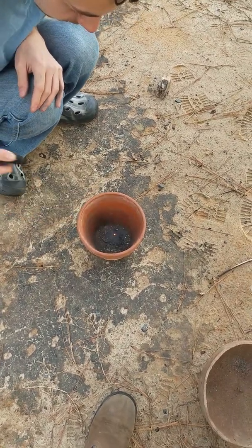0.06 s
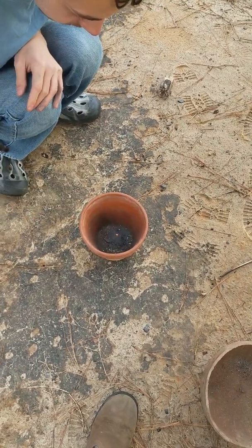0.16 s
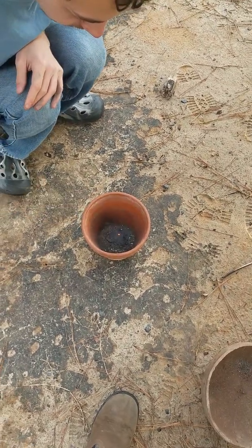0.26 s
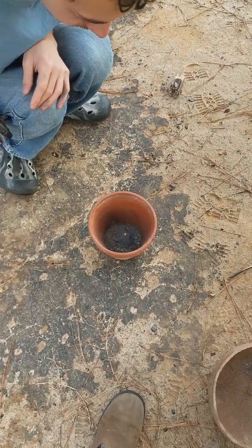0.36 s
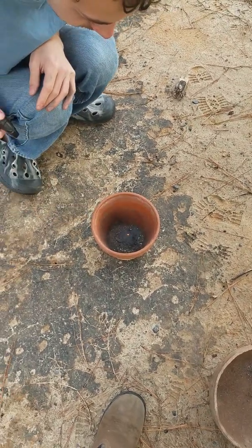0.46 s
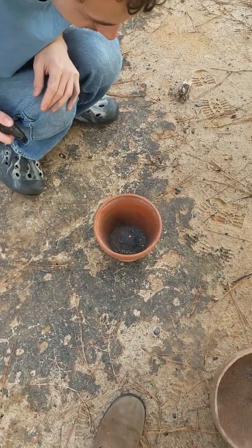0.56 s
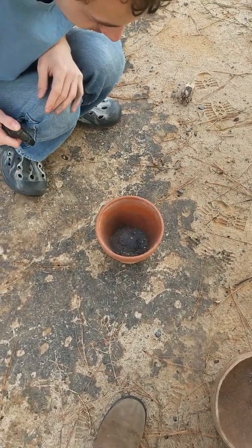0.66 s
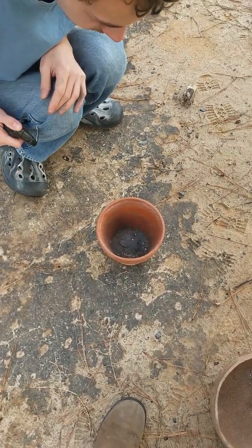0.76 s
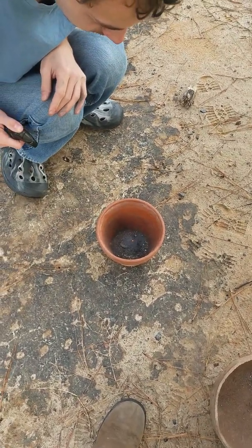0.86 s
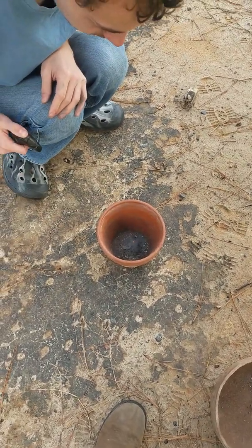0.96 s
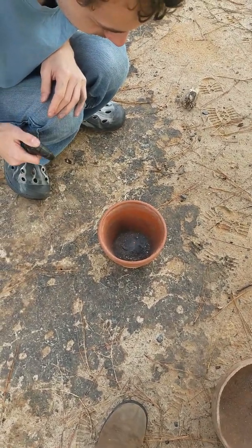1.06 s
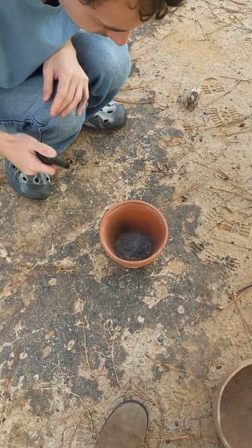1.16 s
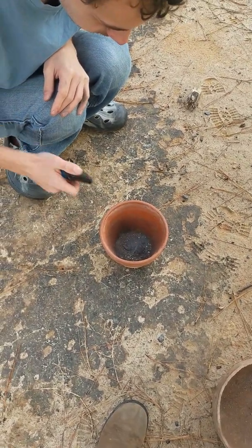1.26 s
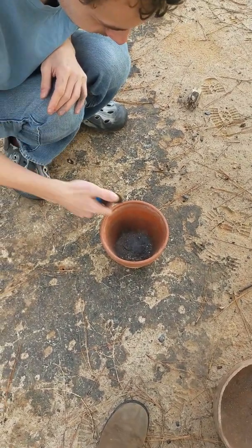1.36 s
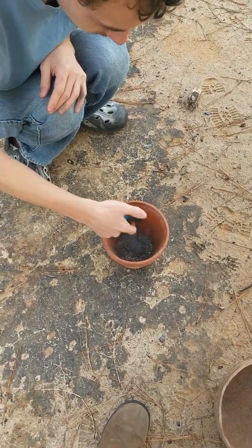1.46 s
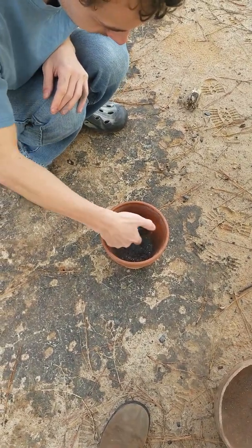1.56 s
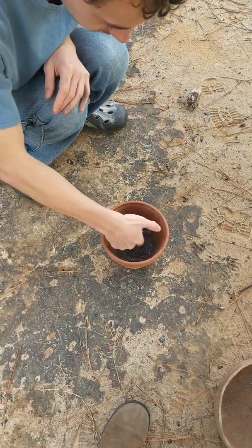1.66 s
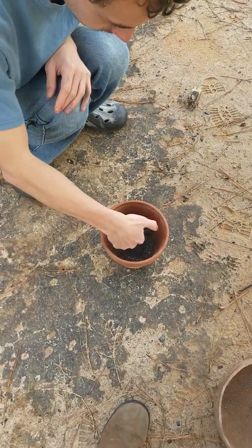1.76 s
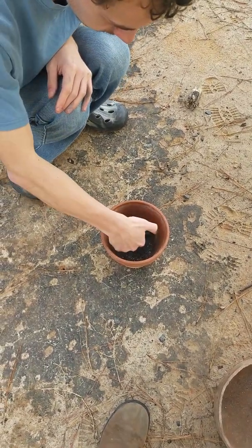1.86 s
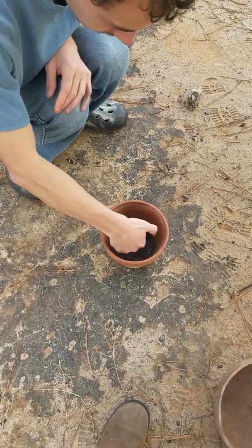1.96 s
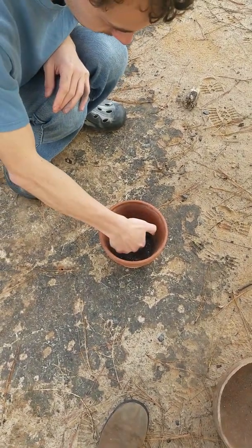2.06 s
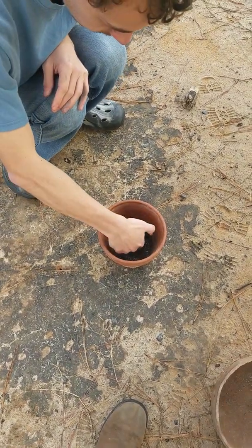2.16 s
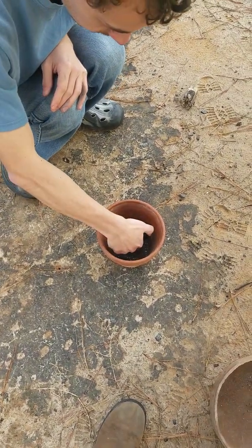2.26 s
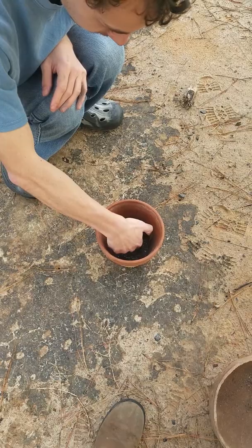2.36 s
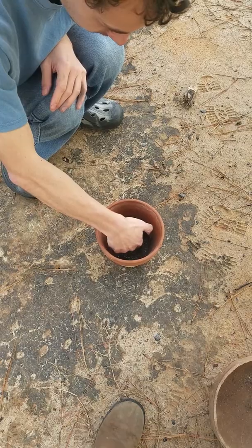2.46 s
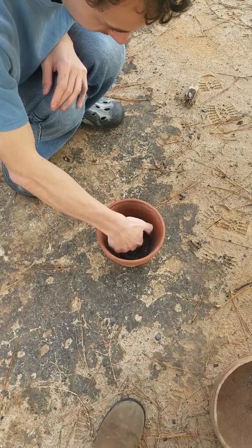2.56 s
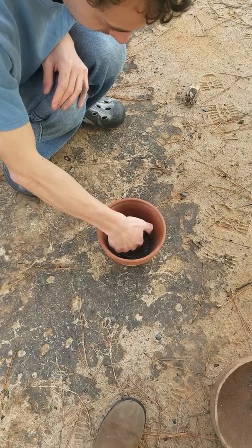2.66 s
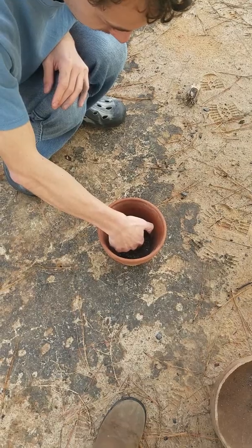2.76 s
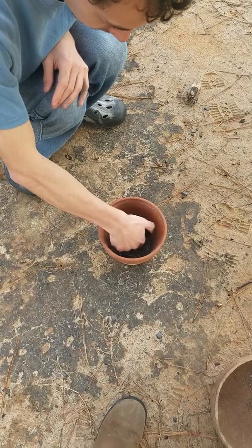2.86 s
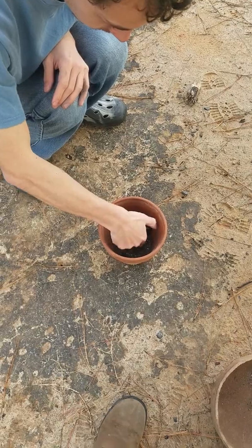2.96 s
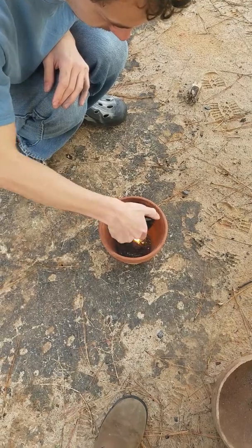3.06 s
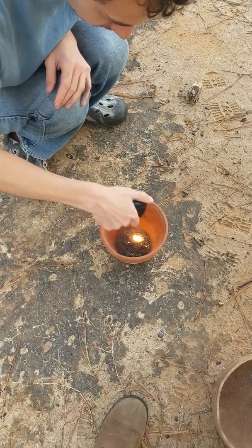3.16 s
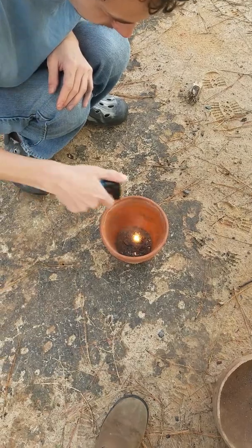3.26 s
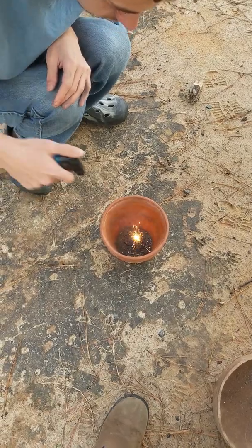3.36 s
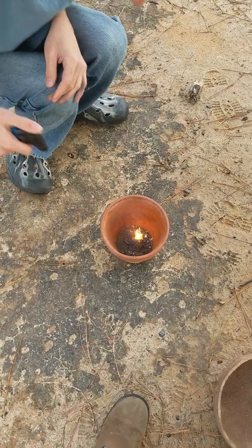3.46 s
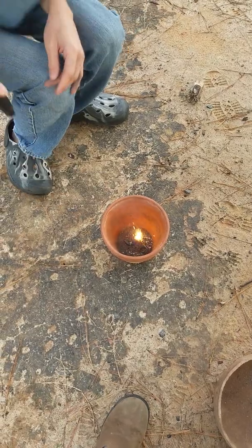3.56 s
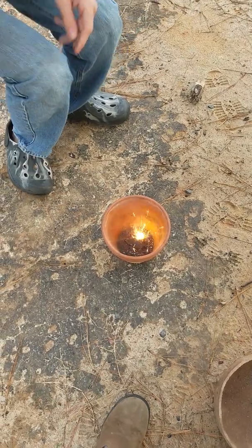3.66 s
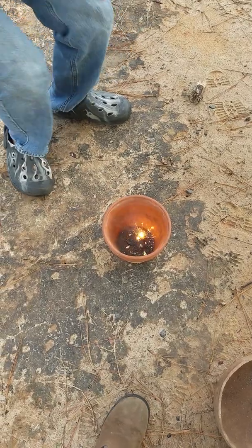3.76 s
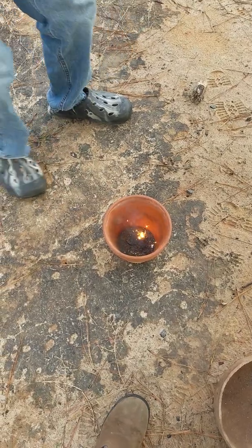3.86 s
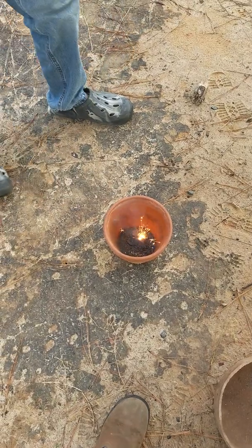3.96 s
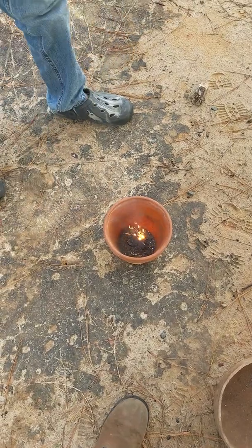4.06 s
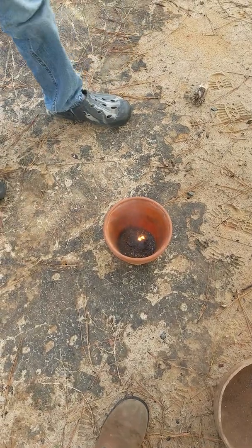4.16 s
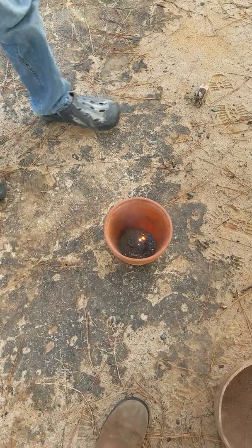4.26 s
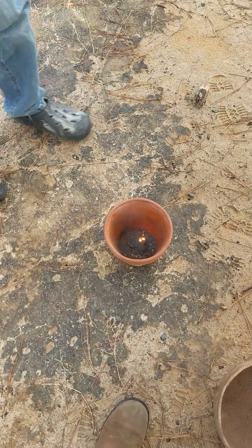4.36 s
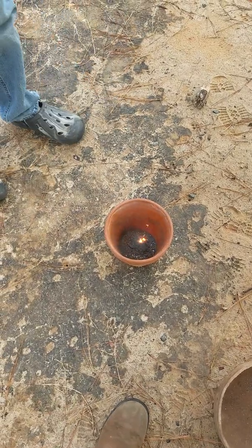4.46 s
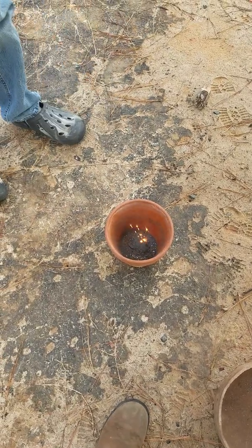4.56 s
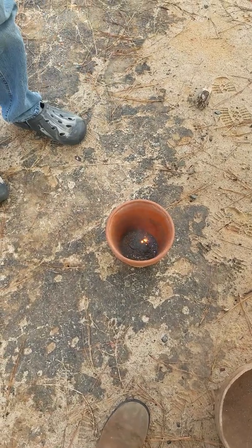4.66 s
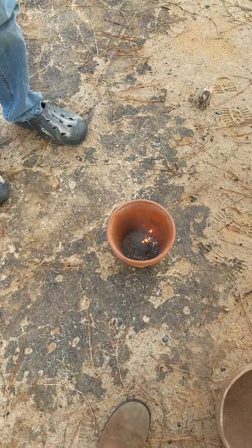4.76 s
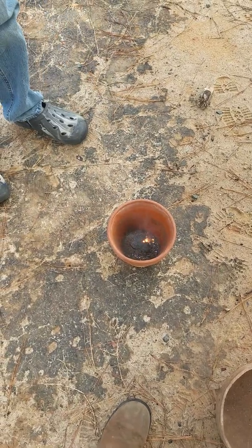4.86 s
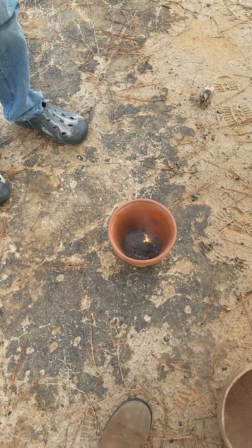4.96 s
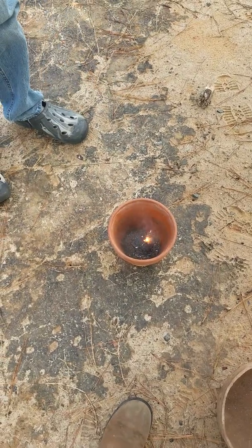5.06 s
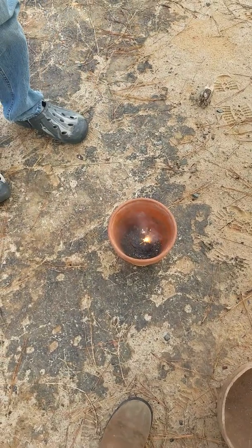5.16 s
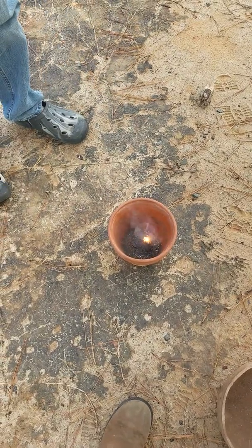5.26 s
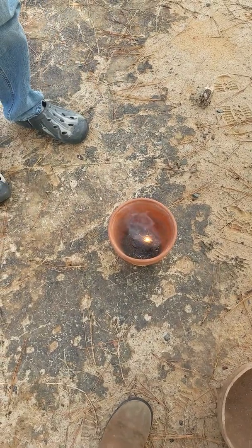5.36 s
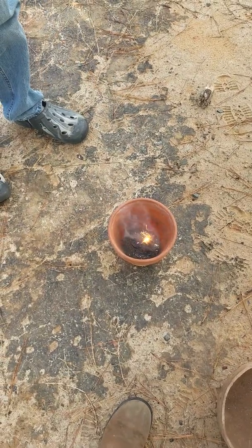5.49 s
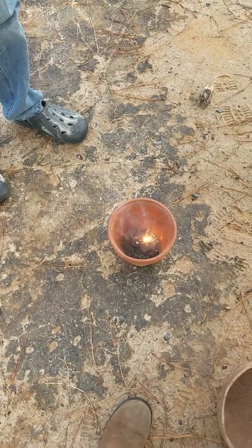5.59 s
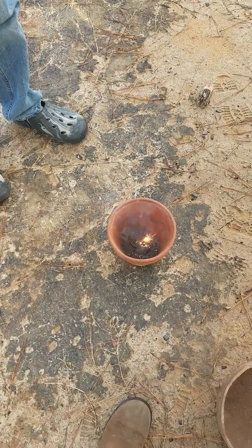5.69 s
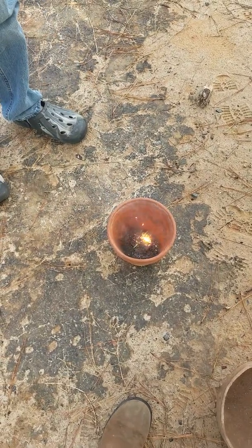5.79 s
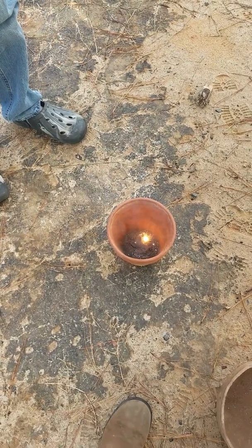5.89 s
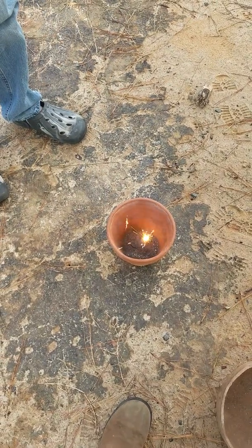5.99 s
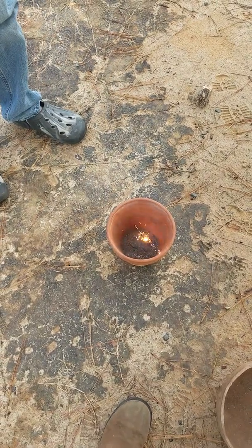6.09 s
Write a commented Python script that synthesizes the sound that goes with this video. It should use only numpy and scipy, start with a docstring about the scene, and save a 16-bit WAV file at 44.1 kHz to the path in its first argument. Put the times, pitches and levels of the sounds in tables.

```python
"""Over a low outdoor rumble, someone crouches with a fading rustle of cloth noise; a faint bird whistles
gliding tones and a far squeal sounds as narrow noise. A lighter knocks as struck modes, its gas hisses as
coloured noise, the igniter snaps in noise bursts and a soft flame roars over a weaker hiss. Powder in a
clay pot catches in showers of tiny grains, the trigger is let go, and the fizz goes on unevenly with pitched
pops and hollow puffs, while shoes scuff back over gritty concrete in resonant scrapes and dull thuds."""
import sys
import numpy as np
from scipy import signal
from scipy.fft import rfft, irfft, next_fast_len
from scipy.io import wavfile

SR = 44100
rng = np.random.default_rng(int(sys.argv[2]) if len(sys.argv) > 2 else 0)


def int16_out(signal):
    """Quantize to a 16-bit WAV file."""
    q = np.round(np.clip(np.atleast_2d(signal).T, -1, 1) * 32767)
    wavfile.write(sys.argv[1], SR, q.astype(np.int16))


N = 270257
TIME = np.arange(N) / SR   # seconds
SIZE = next_fast_len(N + 8192)   # transform length, with room for filter tails
BINS = np.maximum(np.arange(SIZE // 2 + 1) * SR / SIZE, 1)   # Hz


def from_db(db):
    """Decibels to gain."""
    return 10 ** (np.asarray(db) / 20)


def rms_one(x):
    """Scale to unit power."""
    return x / np.sqrt(np.mean(x ** 2) + 1e-20)


def gains(rows):
    """One gain curve per dB column, silent outside the table."""
    s, *columns = np.transpose(rows)
    return [from_db(np.interp(TIME, s, c, left=-np.inf, right=-np.inf)) for c in columns]


def per_bin(points):
    """Read a table along a log-frequency axis."""
    hz, value = np.transpose(points)
    return np.interp(np.log(BINS), np.log(hz), value)


def drift(rate):
    """Random wandering of unit power, with `rate` straight segments a second."""
    knots = rng.standard_normal(int(N / SR * rate) + 2)
    return rms_one(np.interp(TIME * rate, np.arange(len(knots)), knots))


def envelope(start_s, end_s, attack_s, t60):
    """Rise, hold, then die away by 60 dB in t60 seconds."""
    rise = np.clip((TIME - start_s) / attack_s, 0, 1)
    return rise * from_db(-60 * np.maximum(TIME - end_s, 0) / t60)


def white():
    """Two unrelated noises."""
    return rng.standard_normal((2, N))


def grains(per_s, spread_db):
    """One-sample impulses at random moments; a wider spread makes a few stand out."""
    born = rng.random(N) < per_s / SR
    boost_db = spread_db * np.minimum(rng.exponential(1, N), 4)
    return rms_one(white() * born * from_db(boost_db))


def colour(x, spectrum):
    """Causal filter of unit power gain that falls away steeply beyond its table."""
    low_skirt = 1 + (spectrum[0][0] / BINS / np.sqrt(2)) ** 8
    high_skirt = 1 + (BINS / spectrum[-1][0] / np.sqrt(2)) ** 8
    gain = rms_one(from_db(per_bin(spectrum)) / np.sqrt(low_skirt * high_skirt))
    # folding the cepstrum forward gives minimum phase, so the response starts at once
    cepstrum = irfft(np.log(gain + 1e-6), SIZE)
    cepstrum[1:SIZE // 2] *= 2
    cepstrum[SIZE // 2 + 1:] = 0
    return irfft(rfft(x, SIZE) * np.exp(rfft(cepstrum)), SIZE)[:, :N]


def place(x, balance, likeness, lead_s=0):
    """Turn two unrelated signals into a stereo pair; the left's share of the right comes early by lead_s."""
    right, other = rfft(x, SIZE)
    alike = np.clip(per_bin(likeness), 0, 1)
    shared = alike * right * np.exp(2j * np.pi * BINS * lead_s)
    left = shared + np.sqrt(1 - alike ** 2) * other
    return irfft([left * from_db(per_bin(balance)), right], SIZE)[:, :N]


def resonate(x, hz, width_hz):
    """A two-pole resonance with gain near 1 at its top."""
    r = np.exp(-np.pi * width_hz / SR)
    poles = [1, -2 * r * np.cos(2 * np.pi * hz / SR), r * r]
    return signal.lfilter(np.array([1, 0, -1]) * (1 - r * r) / 2, poles, x)


def age(length):
    """Seconds since the start of a short sound."""
    return np.arange(int(length * SR) + 2) / SR


def burst(t60):
    """Dense noise, even in colour, that dies away."""
    t = age(t60)
    fade = from_db(-60 * t / t60)
    phases = np.angle(rfft(rng.standard_normal((2, len(t))) * fade))
    even = irfft(np.exp(1j * phases), len(t)) * fade ** .3
    return rms_one(even) * np.sqrt(np.mean(fade ** 2))


def ring(hz, t60):
    """A struck mode that builds up within about a cycle, in a random phase on each channel."""
    t = age(t60)
    swing = np.sin(2 * np.pi * (hz * t + rng.random((2, 1))))
    return swing * (1 - np.exp(-2 * hz * t)) * from_db(-60 * t / t60)


def add(out, s, sound):
    """Mix a short sound in at a moment."""
    part = out[:, int(s * SR):][:, :sound.shape[1]]
    part += sound[:, :part.shape[1]]


# Spectra of the burning powder: its low rush, its fizz in the flare and its fizz at a smoulder.
# Each row: frequency in Hz, relative level in dB per Hz.
RUSH_SPECTRUM = [(260, -4.5), (400, -9), (580, -1), (900, -2), (1350, 0.5), (1850, -3), (2220, -0.5),
                 (2650, -5), (3250, -3.5), (3850, -8.5), (4200, -12), (4900, -13.5), (5700, -20.5)]
FLARING_SPECTRUM = [(4200, -6.5), (5000, -4), (5800, -8), (6300, -1), (6800, -1), (7400, 3.5), (8500, -2),
                    (9400, -1), (10800, -2), (11800, 1), (12800, -4), (14000, -3), (15000, -4),
                    (15800, -18)]
SMOULDERING_SPECTRUM = [(5700, -14.5), (6000, -12), (6400, -5), (7900, -3), (8600, -8.5), (9300, -5.5),
                        (10000, -6), (11100, -3), (12000, 1), (13000, -3.5), (14000, -8), (14800, -5),
                        (15800, -8)]
# Air resonances in the pot. Each row: frequency in Hz, width in Hz, gain in dB on the rush.
POT_MODES = [(596, 84, -9.5), (2215, 110, -4.5), (3400, 460, -25)]


def powder(rush_db=6.5, fizz_db=7.0, sputter_db=1.0, flicker_db=0.8, flare_ends_s=4.6, settle_s=0.35):
    """Countless grains flash off in sputters; the pot rings with the rush and the fizz changes colour."""
    rush_gain, fizz_gain = burning()
    sputter = from_db(sputter_db * drift(110) + flicker_db * drift(25))
    rush = colour(grains(per_s=6000, spread_db=1.5), RUSH_SPECTRUM)
    pot = sum(from_db(db) * resonate(rush, hz, width) for hz, width, db in POT_MODES)
    rush = rms_one(rush + pot)
    sparks = grains(per_s=22000, spread_db=3.0)
    settled = np.clip((TIME - flare_ends_s) / settle_s + .5, 0, 1)   # crossfade, flare to smoulder
    flaring = (1 - settled) * colour(sparks, FLARING_SPECTRUM)
    fizz = flaring + settled * colour(sparks, SMOULDERING_SPECTRUM)
    return sputter * (from_db(rush_db) * rush_gain * rush + from_db(fizz_db) * fizz_gain * fizz)


# The powder catches, flares, sinks to a smoulder and picks up again.
# Each row: time in seconds, rush level in dB, fizz level in dB, both before the powder's trims.
BURN_COURSE = [(2.6, -72, -79.5), (2.9, -66.5, -65.5), (3.11, -60, -65), (3.19, -58, -59), (3.3, -58, -58),
               (3.6, -51.5, -52), (3.82, -52, -50.5), (3.89, -59, -54), (4.0, -50, -51),
               (4.19, -61.5, -58.5), (4.32, -63, -60), (4.52, -57, -56.5), (4.66, -60.5, -58),
               (5.06, -56.5, -57.5), (5.19, -58, -60), (5.42, -53, -56.5), (5.55, -56, -58.5),
               (6.13, -53.5, -55.5)]
# Spurts of the burning powder.
# Each row: centre in seconds, rush level in dB, fizz level in dB, both before the powder's trims.
SPURTS = [(3.425, -61, -55), (3.78, -53.5, -59), (4.216, -55.5, -55), (4.385, -55.5, -55.5),
          (4.58, -60, -54), (5.475, -51.5, -52), (5.58, -55.5, -57), (5.697, -54, -50), (6.02, -57, -56.5)]
SPURT_S = .07   # each swells and dies in this time


def burning():
    """Gains of rush and fizz: the powers of the slow burn and the spurts add up."""
    power = np.square(gains(BURN_COURSE))
    swell = np.hanning(len(age(SPURT_S))) ** 2
    for s, rush_db, fizz_db in SPURTS:
        add(power, s - SPURT_S / 2, from_db([[rush_db], [fizz_db]]) ** 2 * swell)
    return np.sqrt(power)


# The loudest sparks and grit cracking.
# Each row: start in seconds, pop level in dB before trim, pop centre in Hz, treble level in dB before trim.
CRACKS = [(3.2048, -41, 1330, -54), (3.3595, -36.5, 2260, -33), (3.5818, -43, 1850, -46),
          (3.7105, -46, 2330, -31), (3.7775, -32, 1730, -49), (3.8013, -34, 4200, -48),
          (3.8987, -49, 2230, -45), (4.032, -41, 2240, -54), (4.374, -43, 1030, -46),
          (4.5892, -45, 1688, -52), (4.775, -43.5, 1530, -51.5), (5.0125, -44, 2160, -52),
          (5.4326, -38.5, 1405, -54), (5.4915, -38, 1457, -45), (5.6895, -40, 2150, -42.5),
          (5.9299, -38, 1770, -56), (6.0183, -46, 1980, -49)]


def crackles(pop_db=-8, spit_db=-1, pop_t60=0.014, spit_t60=0.0087,
             sparks_per_s=80, spark_db=-3.0, spark_spread_db=2.0):
    """Each crack is a pitched pop with a spit of treble; lesser sparks snap at random as the powder burns."""
    pops, spits = np.zeros((2, 2, N))
    for s, db, hz, treble_db in CRACKS:
        pop = resonate(resonate(burst(pop_t60), hz, width_hz=480), hz, width_hz=10400)
        add(pops, s, from_db(db + pop_db) * rms_one(pop))
        add(spits, s, from_db(treble_db + spit_db) * burst(spit_t60))
    sparks = signal.fftconvolve(grains(sparks_per_s, spark_spread_db), burst(t60=.006), axes=1)[:, :N]
    rush_gain = gains(BURN_COURSE)[0]
    sparks = from_db(spark_db) * rush_gain * rms_one(sparks)
    return pops + colour(sparks, RUSH_SPECTRUM) + colour(spits + sparks / 2, FLARING_SPECTRUM)


# Gas bursting from the powder. Each row: start in seconds, level in dB.
PUFFS = [(3.205, -43), (3.36, -43), (3.655, -47), (3.752, -40), (3.78, -50), (4.325, -49), (5.43, -52),
         (5.49, -43), (5.69, -47), (5.775, -41), (5.845, -39.5), (6.02, -50)]


def puffs(t60=0.044):
    """Pockets of gas burst and sound the hollow of the pot at its lowest mode."""
    out = np.zeros((2, N))
    for s, db in PUFFS:
        add(out, s, from_db(db) * ring(POT_MODES[0][0], t60))
    return out


# Igniter snap. Each row: start in seconds, level in dB, 60 dB decay in seconds.
SNAP = [(2.1457, -16, 0.017), (2.1458, -9, 0.0063), (2.1476, -18.5, 0.024), (2.1486, -23.5, 0.032),
        (2.1585, -37, .02)]
# Handling of the lighter and the trigger let go.
# Each row: start in seconds, knock level in dB before halving, knock pitch in Hz, tick level in dB.
HANDLING = [(1.2063, -46, 2120, -54), (1.585, -46, 1880, -65), (1.5873, -46.5, 4500, -68),
            (1.772, -56, 2150, -75), (2.9277, -28, 2510, -34.5), (2.9396, -43, 2580, -59)]
# Lighter held inside the pot. Each row: frequency in Hz, level in dB on the blow, 60 dB decay in seconds.
LIGHTER_MODES = [(240, -2, 0.028), (383, -4.5, 0.022), (670, -2, 0.021), (2350, -6, 0.028),
                 (3545, 3.5, 0.023), (4580, -5, 0.031), (4980, 4, 0.034), (5300, -11.5, 0.03219),
                 (5820, -4, 0.03), (6540, 4, .03), (6857, -1, 0.02932), (8000, 6, 0.021),
                 (9100, 10.5, 0.013), (10030, 0.5, .03), (10870, -9, .028), (11990, -13, .03),
                 (13700, -15, .022)]
# Snap and tick spectrum. Each row: frequency in Hz, relative level in dB per Hz.
SNAP_SPECTRUM = [(150, -7), (300, -2), (1000, -10.5), (1600, -10), (2300, 1.5), (2900, -8.5), (3600, 5.5),
                 (4300, -4.5), (5400, 1), (6200, -0.5), (8500, 1), (13500, 2.5), (15000, -8),
                 (15800, -14.5)]
# Stereo lean of the lighter. Each row: frequency in Hz, left minus right in dB.
LIGHTER_BALANCE = [(300, 0.5), (1200, -11), (2200, -4.5), (3300, -9.5), (5800, -1), (8500, -14),
                   (12000, -11.5), (15500, -4.5)]
# Stereo likeness of all the near sounds. Each row: frequency in Hz, left-right likeness from 0 to 1.
NEAR_LIKENESS = [(300, 0.81), (600, 0.99), (1200, 0.7), (3300, 0.9), (5500, 0.3892), (13000, .35),
                 (15000, .1)]


def lighter(body_db=-25, knock_t60=0.0058, tick_t60=0.012, tick_ring_db=-13, scatter_db=-44, scatter_t60=0.12):
    """Gas hisses, the sprung igniter strikes, the jet burns, the trigger knocks back."""
    cracks, body = np.zeros((2, 2, N))
    for s, db, t60 in SNAP:
        add(cracks, s, from_db(db) * burst(t60))
    strike_s = SNAP[1][0]
    add(cracks, strike_s, from_db(scatter_db) * burst(scatter_t60))   # the snap rattles round the pot
    blows = [(strike_s, body_db)]
    for s, knock_db, hz, tick_db in HANDLING:
        add(body, s, from_db(knock_db) * rms_one(ring(hz, knock_t60)) / 2)
        add(cracks, s, from_db(tick_db) * burst(tick_t60))
        blows.append((s, tick_db + tick_ring_db))
    for s, blow_db in blows:   # every contact rings the same body
        for hz, db, t60 in LIGHTER_MODES:
            add(body, s, from_db(blow_db + db) * ring(hz, t60))
    sound = colour(cracks, SNAP_SPECTRUM) + body + jet(strike_s)
    return place(sound, LIGHTER_BALANCE, NEAR_LIKENESS, lead_s=.00002)


# Spectra of the gas hiss, the gas catching and the flame.
# Each row: frequency in Hz, relative level in dB per Hz.
NOZZLE_SPECTRUM = [(5800, -12), (6400, -5.5), (7600, -1.5), (8600, -10), (9400, -7), (10200, -9),
                   (10900, -2), (12000, 1.5), (13400, 2), (14500, -7), (15500, -14.5)]
LIGHTING_SPECTRUM = [(4200, -11), (4950, 5), (5700, -2), (6600, -1), (8500, -5), (10300, -10), (11700, -2),
                     (13400, -3), (15500, -13)]
FLAME_SPECTRUM = [(300, -29), (400, -18.5), (560, -4.5), (750, -8.5), (1000, -6), (1350, -6), (1650, -1.5),
                  (1950, -5.5), (2300, -9), (2800, -14), (3400, -20), (4200, -35), (5000, -40.5)]
VALVE_OPENS_S, VALVE_SHUTS_S = 2.02, 2.93
GAS_DB, GAS_ATTACK_S, GAS_LIT_DB = -60, .012, -67   # hiss before and after lighting
LIGHTING_DB, LIGHTING_HOLD_S, LIGHTING_T60_S = -54.5, .06, 0.19   # the hiss flares as the gas catches
FLAME_DB, FLAME_ATTACK_S, FLAME_T60_S = -52.5, 0.028, 0.28   # level before surge and drift
FLAME_SURGE_DB, FLAME_SURGE_S = 3, 0.13   # swell around lighting and around the valve shutting


def jet(strike_s):
    """Gas hisses, flares at the spark, then hisses more weakly under a soft flame roar;
    both fade once the valve shuts."""
    gas_level = from_db(np.where(TIME < strike_s, GAS_DB, GAS_LIT_DB))
    gas = gas_level * envelope(VALVE_OPENS_S, VALVE_SHUTS_S, GAS_ATTACK_S, FLAME_T60_S)
    lighting_ends_s = strike_s + LIGHTING_HOLD_S
    lighting = from_db(LIGHTING_DB) * envelope(strike_s, lighting_ends_s, GAS_ATTACK_S, LIGHTING_T60_S)
    surge = sum(np.exp(-np.abs(TIME - s) / FLAME_SURGE_S) for s in (strike_s, VALVE_SHUTS_S))
    flame_level = from_db(FLAME_DB + FLAME_SURGE_DB * surge + .7 * drift(40))
    flame = flame_level * envelope(strike_s, VALVE_SHUTS_S, FLAME_ATTACK_S, FLAME_T60_S)
    hiss = gas * colour(white(), NOZZLE_SPECTRUM) + lighting * colour(white(), LIGHTING_SPECTRUM)
    return hiss + flame * colour(white(), FLAME_SPECTRUM)


# Soles on concrete. Each row: start in seconds, length in seconds, level in dB before fading, centre in Hz.
SCUFFS = [(3.563, .04, -48, 1400), (3.772, .012, -45, 900), (3.825, .04, -44, 1160),
          (3.859, 0.013, -40, 950), (3.967, 0.088, -45, 1060), (4.108, 0.049, -50, 1050),
          (4.154, 0.0165, -44, 900), (4.36, 0.04, -41, 970), (4.384, 0.049, -48, 1150)]
# Heels set down. Each row: start in seconds, level in dB before trim, pitch in Hz.
STEPS = [(3.689, -39, 140), (3.876, -39, 126), (3.953, -36, 135), (4.124, -43, 120), (4.511, -46, 91.5),
         (4.851, -41, 80)]


def shoes(thud_t60=0.063, thud_db=3):
    """Grit rolls under soft soles in short, hollow scrapes; the heels thud dully."""
    out, grit = np.zeros((2, N)), grains(per_s=3500, spread_db=0.5)
    for s, length, db, hz in SCUFFS:
        count = len(age(length))
        rub = grit[:, int(s * SR):][:, :count]
        rub = resonate(resonate(rub, hz, width_hz=240), hz, width_hz=1400)
        add(out, s, from_db(db) * rms_one(rub) * np.sqrt(np.hanning(count)))
    for s, db, hz in STEPS:
        add(out, s, from_db(db + thud_db) * ring(hz, thud_t60))
    return out


# Folds of cloth snapping. Each row: start in seconds, level in dB.
FOLDS = [(0.033, -49.5), (.128, -51), (.195, -52), (.291, -66), (.438, -54.5), (.464, -54), (.563, -48.5),
         (0.577, -51), (.70, -56.5)]
# Cloth spectrum. Each row: frequency in Hz, relative level in dB per Hz.
CLOTH_SPECTRUM = [(1500, -3.0), (2500, -4.5), (4000, -11), (5800, -12), (6400, -8), (7400, -1),
                  (8300, -7.5), (9200, -7.5), (10200, -20), (11500, -6.5), (14000, -9), (15500, -8)]
# sleeve and jeans shift, then come to rest; the level is where the sag starts
RUSTLE_DB, RUSTLE_SAG_DB_PER_S, RUSTLE_ENDS_S, RUSTLE_T60_S = -59, 15.5, 0.74, .9


def clothes(tick_t60=0.04):
    """Fibres catch and slip ever more gently; now and then a fold snaps over."""
    motion = from_db(RUSTLE_DB - RUSTLE_SAG_DB_PER_S * TIME) * envelope(0, RUSTLE_ENDS_S, 1 / SR, RUSTLE_T60_S)
    rub = grains(per_s=1800, spread_db=0.0) * motion * from_db(2.0 * drift(70.6))
    for s, db in FOLDS:
        add(rub, s, from_db(db) * burst(tick_t60))
    return colour(rub, CLOTH_SPECTRUM)


# One bird phrase. Each row: start in seconds into the phrase, length in seconds, start pitch in Hz,
# end pitch in Hz, average level in dB before the direct and echo paths.
BIRD_NOTES = [(0, 0.05, 2850, 2570, -71), (0.015, 0.038, 3500, 3200, -73.5), (0.068, .08, 2500, 3400, -75),
              (0.091, 0.101, 2040, 1880, -74), (0.148, .16, 4050, 4850, -79.5)]
# the phrase repeats; its direct sound is weaker than its echo from the trees
BIRD_STARTS_S, BIRD_PERIOD_S, BIRD_DIRECT_DB = 0.78, 0.32, -2.5


def bird(count=4, warble=.016):
    """Wavering, gliding whistles, a little different each time, blurred by distance."""
    out, waver = np.zeros((2, N)), 1 + warble * drift(120)
    for s in BIRD_STARTS_S + BIRD_PERIOD_S * np.arange(count):
        for offset, length, start_hz, end_hz, db in BIRD_NOTES:
            size = len(age(length))
            glide = np.linspace(start_hz, end_hz, size) * waver[int((s + offset) * SR):][:size]
            note = np.sin(2 * np.pi * np.cumsum(glide) / SR) * np.hanning(size)
            add(out, s + offset, from_db(db + rng.normal(0, 1.7)) * note[None])
    trees = burst(t60=0.17)
    echo = signal.fftconvolve(out, trees / np.linalg.norm(trees[0]), axes=1)[:, :N]
    return from_db(BIRD_DIRECT_DB) * out + echo


SQUEAL_STARTS_S, SQUEAL_ENDS_S, SQUEAL_DB, SQUEAL_ATTACK_S, SQUEAL_T60_S = 0.87, 1.06, -69.5, .04, .7


def squeal(hz=1275, width_hz=55):
    """One faint, far, unsteady tone: noise through two narrow resonances."""
    level = from_db(SQUEAL_DB) * envelope(SQUEAL_STARTS_S, SQUEAL_ENDS_S, SQUEAL_ATTACK_S, SQUEAL_T60_S)
    return level * rms_one(resonate(resonate(white(), hz, width_hz), hz, width_hz))


# Spectra of the rumble and the hush of the air. Each row: frequency in Hz, relative level in dB per Hz.
RUMBLE_SPECTRUM = [(20, -13), (30, -13.5), (40, -6.5), (50, -2), (65, 0.5), (95, 2.5), (125, -1.5),
                   (155, -6), (185, -12.5), (210, -11), (255, -17.5), (300, -25.5), (400, -32.5)]
AIR_SPECTRUM = [(300, -1.5), (480, -2.5), (700, -4), (1200, -7.5), (2000, -12), (3200, -15.5),
                (4000, -18.5), (4500, -18.5), (6000, -25.5), (7400, -24.5), (8500, -29), (10000, -30),
                (12500, -22.5), (15000, -20)]
# Stereo lean of the background. Each row: frequency in Hz, left minus right in dB.
AIR_BALANCE = [(100, -1.5), (300, -4), (700, -3), (1500, -4), (3000, -1), (7400, -2.5), (10000, 0.5),
               (15000, 1)]
# Stereo likeness of the background. Each row: frequency in Hz, left-right likeness from 0 to 1.
AIR_LIKENESS = [(60, 0.98), (130, 0.97), (290, 0.82), (640, 0.23), (1400, 0), (15000, 0)]


def outdoors(rumble_db=-51.0, air_db=-61.5, gust_db=0.9):
    """Low wind rumble, as gusting dark noise, under a thin, even hush."""
    rumble = colour(white(), RUMBLE_SPECTRUM) * from_db(rumble_db + gust_db * drift(6.4))
    hush = from_db(air_db) * colour(white(), AIR_SPECTRUM)
    return place(rumble + hush, AIR_BALANCE, AIR_LIKENESS)


# Stereo lean of the sounds near the pot. Each row: frequency in Hz, left minus right in dB.
POT_BALANCE = [(250, -3.5), (600, -3.5), (1200, -10), (1800, -5), (2600, -9), (3300, -8), (4300, -1.5),
               (5700, -11), (6400, -5), (7200, -18), (8000, -10), (9200, -24), (10200, -8), (12000, -10.5),
               (13500, -8.5), (15000, -2)]


def scene():
    """Powder, shoes and clothes lean to the right; the rest joins them."""
    near = powder() + crackles() + puffs() + shoes() + clothes()
    near = place(near, POT_BALANCE, NEAR_LIKENESS, lead_s=.00003)
    return near + lighter() + outdoors() + bird() + squeal()


CUTOFF_HZ = 15900


def record(dry):
    """The top is cut steeply."""
    lowpass = signal.ellip(12, .2, 75, CUTOFF_HZ, fs=SR, output="sos")   # 0.2 dB ripple, 75 dB stop
    return signal.sosfilt(lowpass, dry)


dry = scene()
out = record(dry)
int16_out(out)
```